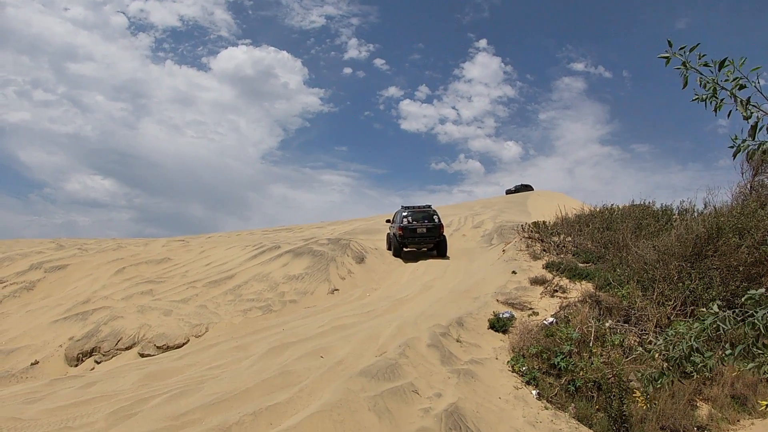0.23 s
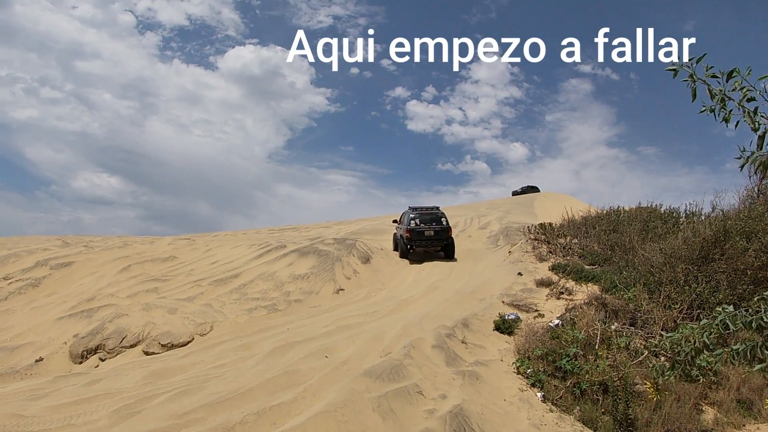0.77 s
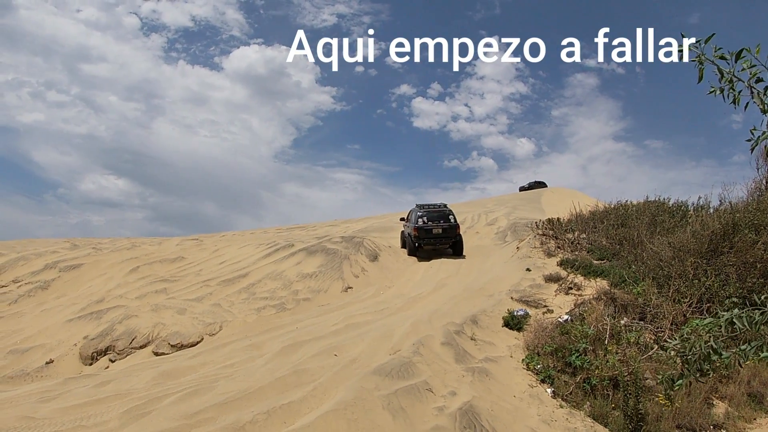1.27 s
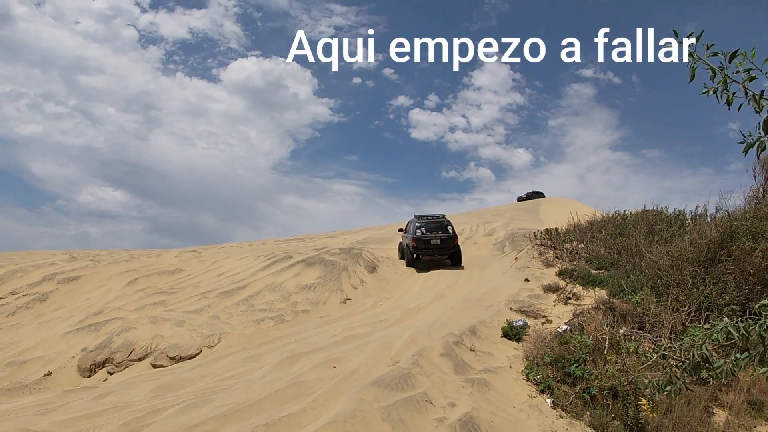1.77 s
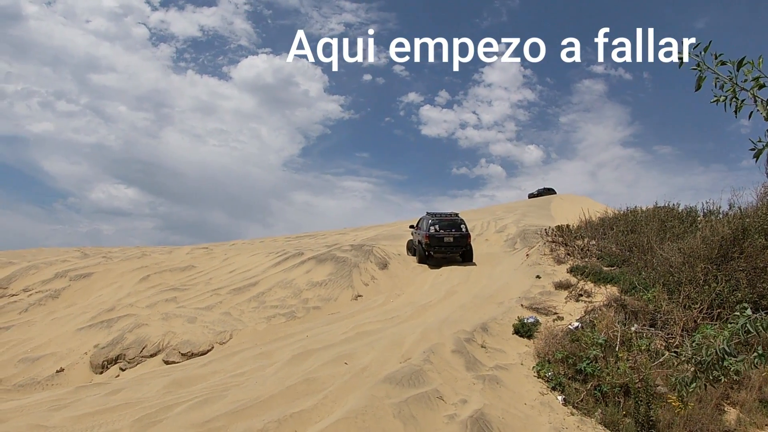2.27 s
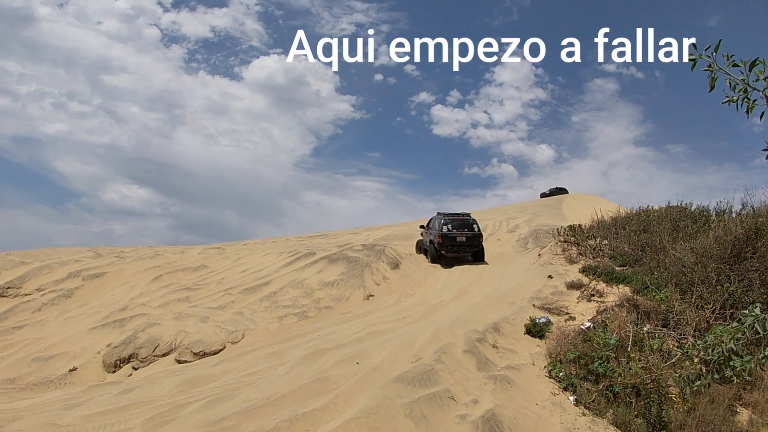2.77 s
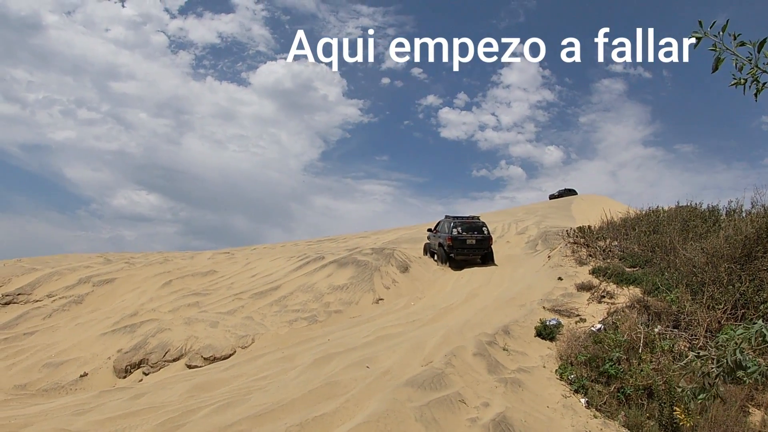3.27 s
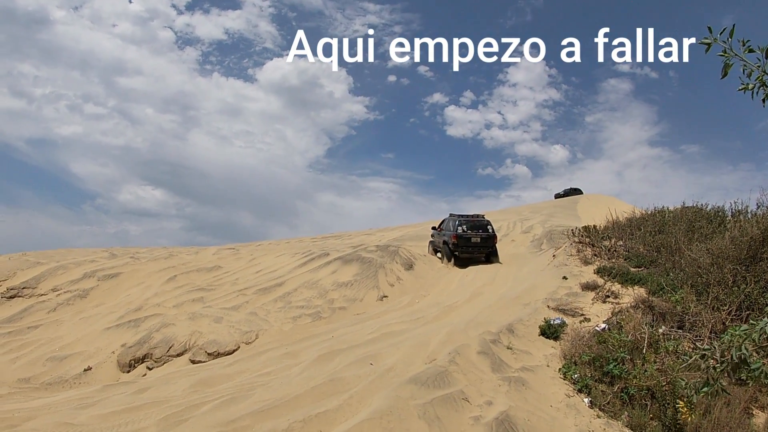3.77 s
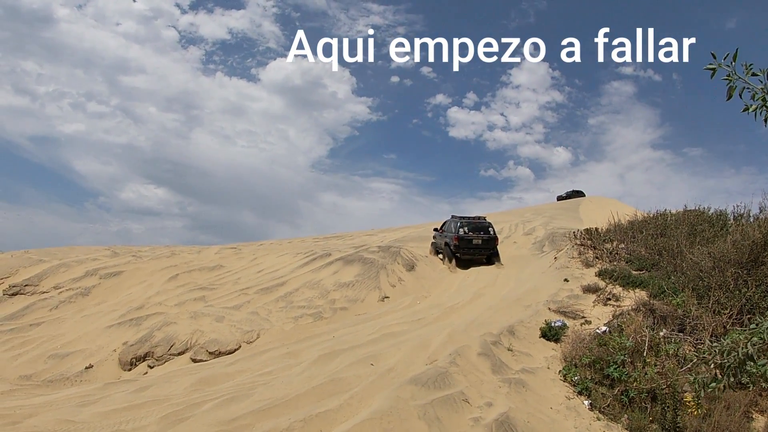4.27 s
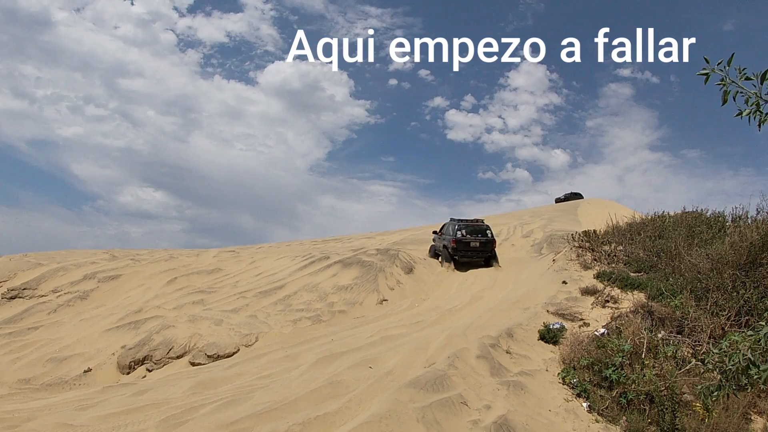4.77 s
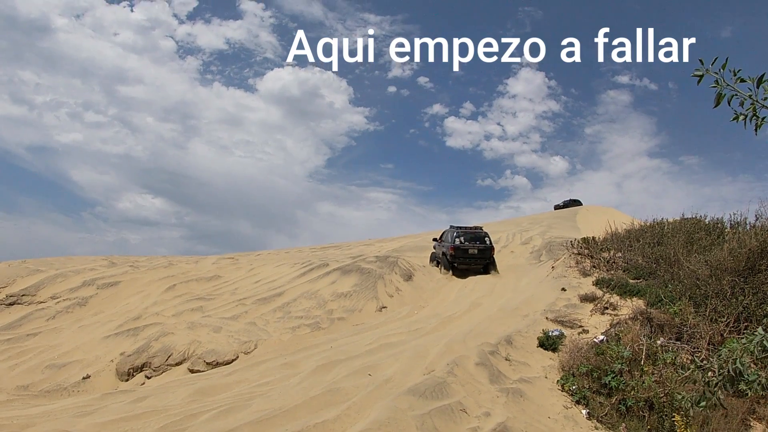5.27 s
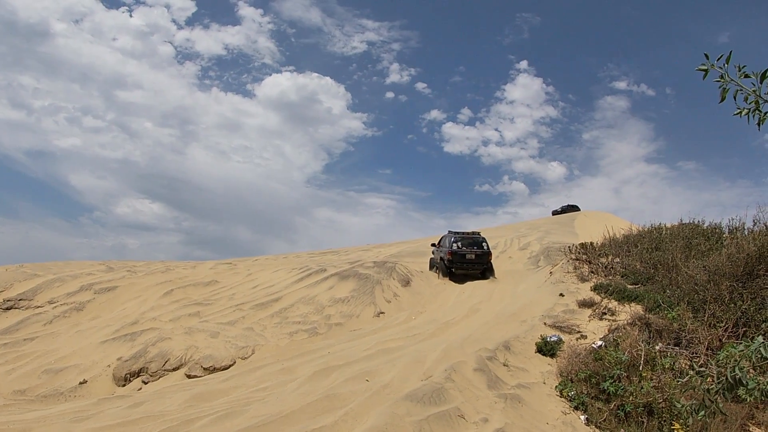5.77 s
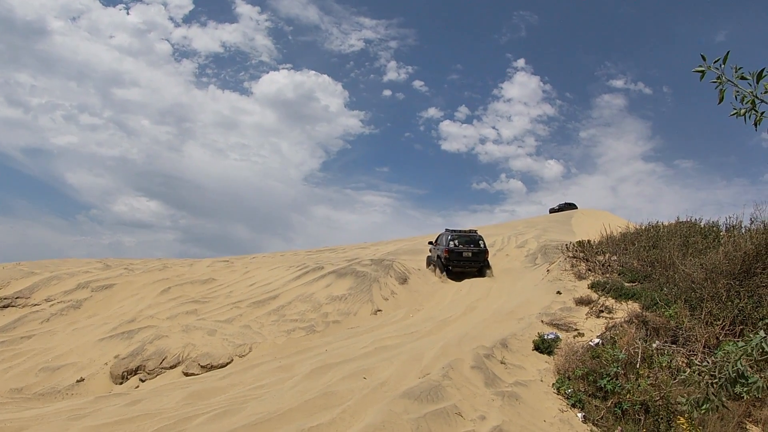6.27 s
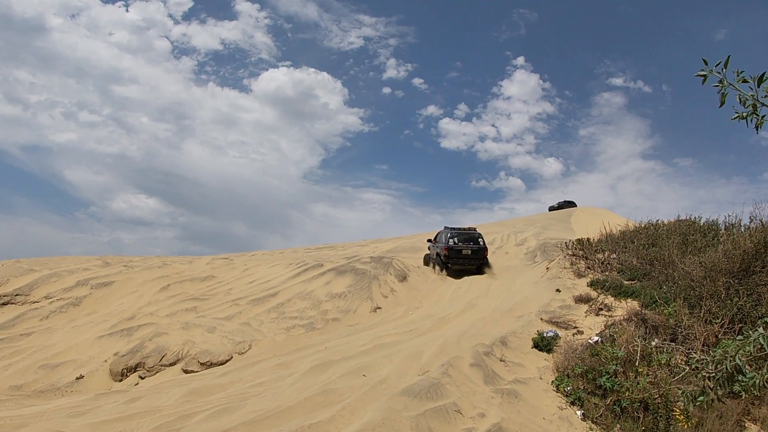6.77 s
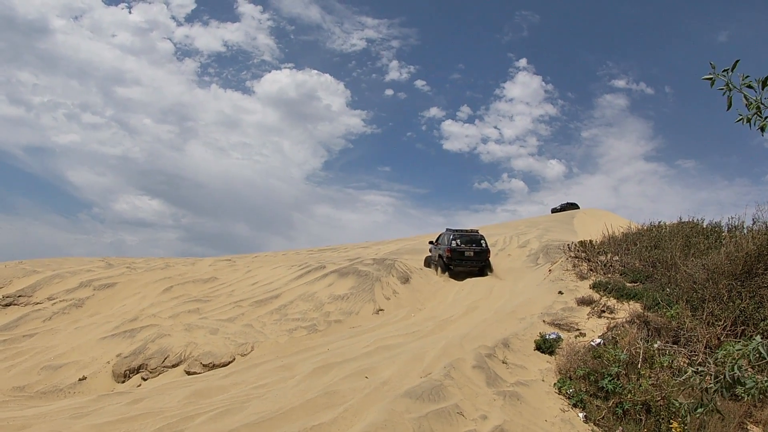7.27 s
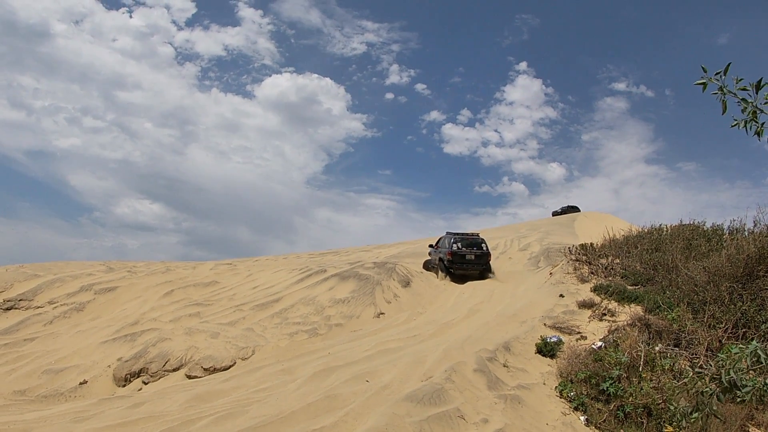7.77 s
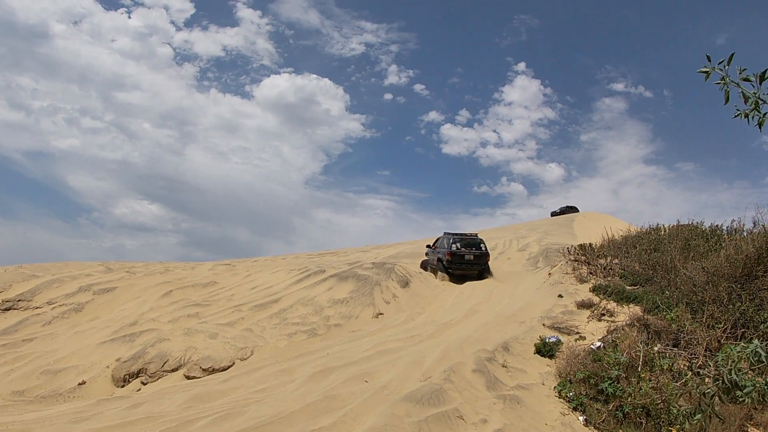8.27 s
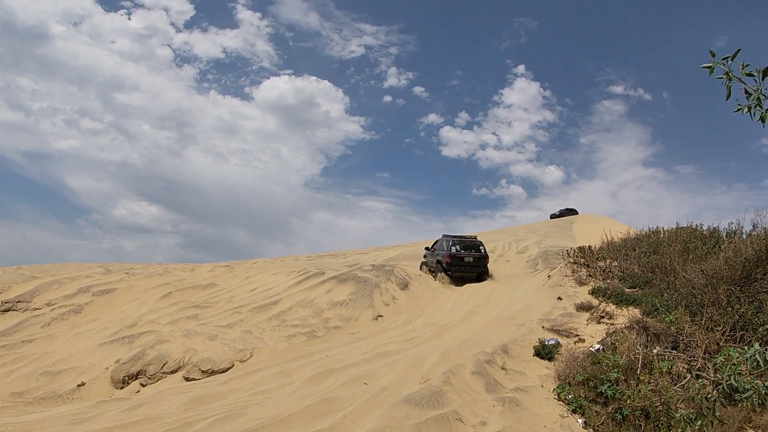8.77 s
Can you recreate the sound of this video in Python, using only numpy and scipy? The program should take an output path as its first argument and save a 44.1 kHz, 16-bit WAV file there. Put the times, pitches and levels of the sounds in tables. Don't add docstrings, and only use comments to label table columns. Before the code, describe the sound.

Some way off in the open, a big off-road engine lugs with a deep throbbing burble, then revs up over about three seconds. One cylinder drops out and the note turns to a rough gallop with popping exhaust, held high and steady except for one brief throttle lift. Sand and gas hiss. Wind thumps and small case ticks hit the phone microphone early on.

```python
import sys
import numpy as np
from scipy import signal
from scipy.io import wavfile
from scipy.ndimage import uniform_filter1d

SR = 44100
rng = np.random.default_rng(int(sys.argv[2]) if len(sys.argv) > 2 else 0)


def ratio(d):
    e = np.asarray(d, float) / 20
    return 10 ** e


def int16_out(signal):
    q = np.round(np.clip(np.atleast_2d(signal).T, -1, 1) * 32767)
    wavfile.write(sys.argv[1], SR, q.astype(np.int16))


N = 398223

# (t/s, firing rate f/Hz)
SPEED = [(0.0, 43.63), (0.69, 51.26), (1.31, 47.0), (1.56, 51.3), (1.75, 58.35), (2.0, 82.93), (2.4, 81.17),
         (2.6, 86.46), (3.14, 111.43), (3.3, 115.43), (3.68, 135.11), (4.16, 144.22), (5.01, 143.15),
         (5.43, 146.21), (6.25, 154.74), (7.01, 155.7), (8.18, 151.94), (9.03, 161.89)]
LIFT_S, SAG_S, SAG_HZ = 5.56, .12, 19.2


def speed():
    since_lift = np.maximum(np.arange(N) / SR - LIFT_S, 0) / SAG_S
    return curves(SPEED)[0] - SAG_HZ * since_lift * np.exp(1 - since_lift)


def crank():
    rate = speed() / 8
    return rate, np.cumsum(rate) / SR


# (t/s, level/dB)
EFFORT = [(0, -0.5), (.3, -5.5), (.5, -1), (.65, -5.5), (1.2, -3.5), (1.55, -2.5), (1.68, -7), (1.78, -2),
          (2.4, -1.5), (3, 1), (3.67, -0.5), (4.2, 1.5), (5.57, .5), (5.62, -5), (5.7, -1), (5.9, 1.5),
          (6.34, -.5), (9.03, 0)]


def effort():
    return curves(EFFORT)[0]


# (f/Hz, level/dB)
OUTLET = [(45, -26.5), (62, -17.5), (100, -15), (160, -17), (210, -30), (250, -52.5), (490, -55.5),
          (600, -37)]
VALVE_TONES = [-0.5, -7, -9.5, -15]
BUZZ_HZ, BUZZ_WIDTH_HZ, BUZZ_DB = 236, 8, -44


def firing():
    rate, charge_db = speed(), effort()
    firings = 8 * crank()[1]
    leads = [.218, -.18, .44, -.02]
    near = np.exp(-((5 * rate - BUZZ_HZ) / BUZZ_WIDTH_HZ) ** 2)
    out = ratio(BUZZ_DB) * near * np.cos(10 * np.pi * firings)
    for k, (valve_db, lead) in enumerate(zip(VALVE_TONES, leads), start=1):
        level = ratio(valve_db + curves(OUTLET, k * rate)[0] + charge_db)
        out += np.sqrt(2) * level * np.cos(2 * np.pi * (k * firings + lead))
    return out


# (f/Hz, sharpness)
PIPE = [(41.5, 3.4), (105.5, 6.5), (180.5, 6.7)]
ECHO, ECHO_S = .487, .014


def pipe(hz, buzz):
    out = -hz ** 2 * (1 + ECHO * np.exp(-2j * np.pi * hz * ECHO_S))
    for f, sharp in PIPE:
        out = out / (1 - (hz / f) ** 2 + 1j * hz / f / sharp)
    panel = 1 + 2.0 * buzz * np.exp(-((hz - 244) / 15) ** 2)
    return out * panel / (1 + (hz / 262) ** 16)


PANEL_HZ = (139, 147)


def unevenness(cylinders, late, hurry):
    rate, cycles = crank()
    cycles = cycles + hurry * (np.maximum(rate, 16.7) - 17.3) / 8
    coarse_rate = rate[::64]
    buzz = np.interp(8 * coarse_rate, PANEL_HZ, [.2, 1.2])
    strength, lateness = np.transpose(cylinders)
    place = np.arange(8) + lateness + late
    out, power = np.zeros(N), np.zeros(N)
    for k in [1, 2, 3, 4, 5, 6, 7, 9, 10, 11, 12, 13, 14]:
        share = np.sum(strength * np.exp(-2j * np.pi * k * place / 8))
        tone = share * np.repeat(pipe(k * coarse_rate, buzz), 64)[:N]
        out += (tone * np.exp(2j * np.pi * k * cycles)).real
        power += abs(tone) ** 2 / 2
    return out / np.sqrt(power)


HEALTHY = [(.92, 0), (1, -.07), (.85, .01), (1.27, .02), (1.07, -.1), (1, .006), (1.16, -.057), (.72, .026)]
# (firing rate f/Hz, unevenness level/dB)
UNEVEN = [(43, -25.5), (50, -42), (72, -18), (82, -25.5), (110, -33.5)]
DIES_S = 3.15


def healthy():
    level = ratio(curves(UNEVEN, speed())[0])
    return (1 - after(DIES_S, 0.072)) * level * unevenness(HEALTHY, late=2.77, hurry=0)


MISFIRING = [(1.5, 0), (1.26, .006), (-.65, -.117), (1.45, .176), (.69, -.007), (1.67, .014), (.94, .013),
             (1.12, .124)]
# (firing rate f/Hz, lope level/dB)
LOPE = [(105, -32.5), (112, -25), (120, -21), (135, -20), (145, -20.5), (155, -17.5)]
FALTERS_S = 2.96


def lope():
    level = ratio(curves(LOPE, speed())[0] + .4 * effort())
    return after(FALTERS_S, .08) * level * unevenness(MISFIRING, late=1.27, hurry=.06)


# (firing rate f/Hz, pop level/dB, second pop level/dB against the first, rush level/dB)
MISFIRE = [(110, -37, -7.5, -69), (130, -29.5, -4, -48), (141, -37, -6, -55), (152.3, -34, 2, -45.5)]
# (place in the cycle [0-1], level/dB, ring f/Hz, t60/s)
POPS = [
    (.6, 3.5, 600, .014),
    (.79, -3, 420, .03),
    (.59, -4, 410, .025),
    (.8, -9, 345, .04),
    (.82, -5, 640, .015),
    (.06, -5, 520, .02),
    (.25, -10, 470, .025),
    (.37, -13, 520, .02),
]
# (f/Hz, level/dB per Hz)
POP_COLOUR = [(150, -24.5), (260, 8.5), (290, -21), (420, -2), (478, -12.5), (648, 0.5), (815, -31),
              (908, -10.5), (1150, -24), (1400, -21.5), (3500, -37.5), (4550, -62.5), (7700, -120)]
POP_EFFORT, RUSH_EFFORT = 2.6, 2.4


def pops():
    pop_db, second_db, rush_db = curves(MISFIRE, speed())
    pop_db = pop_db + POP_EFFORT * effort()
    rush_db = rush_db + RUSH_EFFORT * effort()
    slams, t = np.zeros(N), np.arange(2500) / SR
    for k, (place, db, hz, t60) in enumerate(POPS):
        ring = ratio(db - 60 * t / t60) * np.sin(2 * np.pi * hz * t) * (1 - np.exp(-t / .0007))
        level = ratio(pop_db + second_db * (k in (1, 3)))
        slams += signal.oaconvolve(strikes(place, .0001, 1.2) * level, ring)[:N]
    flame = np.exp(-t / .0035) * (1 - np.exp(-t / .0004))
    sparks = strikes(.6, .0003, 1.2) + .25 * strikes(.81, .0005, 2.2)
    lit = signal.oaconvolve(sparks, flame)[:N]
    rush = ratio(rush_db) * coloured(lit * rng.standard_normal(N), POP_COLOUR)
    return after(DIES_S + 0.052, 0.28) * (1.42 * slams + rush)


# (tones a cycle, level/dB)
RASP = [(18, -53), (19, -54), (21, -57), (22, -53), (23, -54)]


def rasp():
    cycles = crank()[1]
    up = np.interp(speed(), [135, 153], [0, 1])
    waver, out = lumps(.05), np.zeros(N)
    for k, db in RASP:
        level = ratio(db + 2 * np.roll(waver, 999 * k))
        out += level * np.sqrt(2) * np.cos(2 * np.pi * k * (cycles - .84))
    return up * out


# (f/Hz, level/dB)
WHINE = [(774, -59), (1178, -66), (345, -59)]


def whine():
    t = np.arange(N) / SR
    return sum(ratio(db - 1.3 * t + 1.5 * lumps(.08)) * np.sin(2 * np.pi * hz * t) for hz, db in WHINE)


# (firing rate f/Hz, roar level/dB, fine hiss level/dB against it)
ROAR = [(44.7, -55, -15.5), (84, -55.5, -16.5), (115, -57.5, -15.5), (151, -57, -10.5), (164, -54, -10)]
# (t/s, length/s, roar level/dB, hiss level/dB against it)
SPRAYS = [(.08, 0.52, 2.5, -3.5), (.8, 1, -0.5, -1), (1.24, 0.79, 4, -1.5), (1.33, 0.09, 0.5, 7),
          (2.03, 0.66, 2, 1.5), (5.92, 0.32, 2, -1), (6.8, .8, 1, -1), (8.2, 1, 4, -1.5),
          (8.38, 0.26, -1.5, 6), (8.6, 0.48, -1, -0.5), (9.03, .4, -1, -0.5)]
# (f/Hz, level/dB per Hz)
ROAR_COLOUR = [(150, -31), (300, -0.5), (520, -9), (850, -13), (1040, -10.5), (1250, -13.5), (1500, -13),
               (1800, -14.5), (2080, -14), (2330, -18.5), (2570, -17.5), (2850, -27), (4300, -29),
               (8800, -67.5)]
# (f/Hz, level/dB per Hz)
HISS_COLOUR = [(1760, -31), (3000, -9.5), (3690, -15), (4300, -7), (5490, -3), (6400, -5), (7090, -10.5),
               (7400, -15), (8490, -9), (9000, -7), (9900, -15.5), (10700, -27.5), (11400, -39.5),
               (13300, -41.5), (14500, -47.5)]
# (f/Hz, level/dB per Hz)
GAS_COLOUR = [(1200, -21), (1450, 6), (1780, -11), (2064, -3.5), (2300, -16), (2500, -4.5), (3350, -12.5),
              (3650, -30.5)]
GAS_DB, ROAR_EFFORT = -13, 0.55


def roar():
    roar_db, hiss_db = np.add(curves(ROAR, speed()), swells(SPRAYS))
    roar_db = roar_db + ROAR_EFFORT * effort() * after(DIES_S, 0.69)
    since_pop = (crank()[1] - .58) % 1
    surge = after(DIES_S, .3) * (1 - 2 * since_pop ** 2)
    gas_db = GAS_DB + curves(MISFIRE, speed())[2] + RUSH_EFFORT * effort()
    gas = after(DIES_S, 0.33) * (1 + .5 * surge) * coloured(rng.standard_normal(N), GAS_COLOUR)
    body = coloured(rng.standard_normal(N) * ratio(1.5 * lumps(0.0099)), ROAR_COLOUR)
    hiss = coloured(rng.standard_normal(N) * ratio(1.1 * lumps(0.025)), HISS_COLOUR)
    sand = (1 + 0.25 * surge) * body + ratio(hiss_db - 3.0) * (1 + 0.11 * surge) * hiss
    return ratio(roar_db + 5.5) * sand + ratio(gas_db) * gas


# (t/s, peak level/dB, centre f/Hz, width/Hz, t60/s)
TICKS = [(0.923, -40, 2200, 1200, .05), (1.091, -43.5, 2200, 2400, 0.044), (1.2, -42, 2300, 2400, 0.055),
         (1.25, -39, 1790, 2600, .03), (1.262, -42, 2200, 2780, 0.036), (1.341, -51, 8000, 4000, .005),
         (1.351, -49, 8500, 3000, .005), (1.358, -21, 5230, 2330, 0.0071), (1.3581, -27, 8450, 4600, 0.005),
         (1.358, -33, 2830, 1200, .005), (1.3582, -41.5, 13500, 1980, 0.0035), (1.4, -42, 2600, 4000, .04),
         (1.945, -37.5, 2180, 3000, 0.061), (3.15, -48, 2140, 1600, .04), (2.035, -49, 3500, 3000, .03),
         (2.1, -43.5, 2320, 2210, 0.044), (2.919, -55, 8500, 7000, 0.0044),
         (2.9218, -33, 8100, 5400, 0.0069), (2.921, -43, 4620, 1000, .004),
         (2.922, -41, 2680, 1200, 0.0089), (3.0286, -35, 4930, 1810, 0.0038),
         (3.029, -50, 8500, 5000, .004), (3.03, -48, 2600, 1400, .006), (3.0335, -41.5, 6000, 7940, .005),
         (4.658, -43, 2210, 2500, 0.029)]


def ticks():
    out, t = np.zeros(N), np.arange(3000) / SR
    for s, db, hz, width, t60 in TICKS:
        band = signal.butter(4, [max(hz - width / 2, 300), hz + width / 2], "band", fs=SR)
        click = (t == 0) * (t60 < .009) * 4
        snap = click + rng.standard_normal(len(t)) * ratio(-60 * t / t60)
        onset = np.minimum(t / t60 * 6 + (t60 < .02), 1)
        burst = signal.lfilter(*band, snap * onset)
        out[round(s * SR):][:len(t)] += ratio(db) * burst / abs(burst).max()
    return out


# (f/Hz, level/dB)
WIND_COLOUR = [(10, -14.5), (25, 1), (50, -4.5), (110, -3), (200, -13.5), (300, -33), (600, -44.5),
               (1200, -70)]
# (t/s, length/s, level/dB)
GUSTS = [
    (.1, 0.15, 12.5),
    (.29, 0.48, 4.5),
    (.54, 0.26, -2),
    (.66, 0.21, 6),
    (.8, 0.26, 7),
    (1.6, 0.27, 8.5),
    (1.92, 1, 5.5),
    (2.6, 0.65, 3.5),
    (3, 0.76, 7),
    (4, 1, 10),
]
# (t/s, peak level/dB)
THUMPS = [
    (0.035, -33),
    (0.088, -24),
    (0.174, -28.5),
    (0.321, -22.5),
    (0.653, -34),
    (0.724, -28.5),
    (0.813, -27),
    (1.597, -30),
    (2.975, -30),
    (2.991, -26.5),
]
BREEZE_DB, EASES_DB_PER_S, CALM_DB = -27, 3, -40.5


def wind():
    rumble = coloured(rng.standard_normal(N) * ratio(2.6 * lumps(0.018)), WIND_COLOUR)
    breeze_db = np.maximum(BREEZE_DB - EASES_DB_PER_S * np.arange(N) / SR, CALM_DB)
    out = ratio(breeze_db + swells(GUSTS)[0]) * rumble
    t = np.arange(2600) / SR
    soft = signal.butter(4, 520, fs=SR)
    for s, db in THUMPS:
        push = np.sin(2 * np.pi * 190 * t) * np.exp(-t / 0.0053)
        flutter = 3 * rng.standard_normal(len(t)) * t / 0.0062 * np.exp(-t / 0.0031)
        puff = signal.lfilter(*soft, push + flutter)
        part = out[round(s * SR):][:len(t)]
        part += ratio(db + 10.5) * puff / abs(puff).max()
    return out


def evened(x):
    return x / np.sqrt(np.mean(x ** 2) + 1e-20)


def curves(rows, by=None):
    s, *columns = np.transpose(rows)
    control = np.arange(N) / SR if by is None else by
    return [np.interp(control, s, c) for c in columns]


def coloured(x, points):
    f, db = np.transpose(points)
    hz = abs(np.fft.fftfreq(8192, 1 / SR))
    log_gain = np.log(ratio(np.interp(np.log(hz + 1), np.log(f), db, -100, -100)))
    taps = np.fft.ifft(np.exp(np.conj(signal.hilbert(log_gain)))).real[:4096]
    return evened(signal.oaconvolve(x, taps)[:N])


def lumps(width_s):
    size = round(width_s * SR)
    return evened(uniform_filter1d(uniform_filter1d(rng.standard_normal(N), size), size))


def strikes(place, jitter_s, spread_db):
    at = np.flatnonzero(np.diff(np.floor(crank()[1] - place)))
    luck = rng.standard_normal((len(at), 2))
    shift = (jitter_s * SR * luck[:, 0]).astype(int)
    out = np.zeros(N)
    out[np.clip(at + shift, 0, N - 1)] = ratio(spread_db * luck[:, 1])
    return out


def swells(rows):
    s, length, *db = np.transpose(rows)
    t = np.arange(0, N, 64)[:, None] / SR
    hump = np.cos(np.pi * np.clip((t - s) / length, -.5, .5)) ** 2
    return [np.repeat(hump @ d, 64)[:N] for d in db]


def after(s, rise_s):
    return np.clip((np.arange(N) / SR - s) / rise_s + .5, 0, 1)


def scene():
    air = ratio(0.13 * lumps(0.0091))
    exhaust = (firing() + healthy() + lope()) * air
    vehicle = exhaust + pops() + rasp() + whine() + roar()
    return (vehicle + ticks() + wind())[None]


def low_pass(x):
    return signal.sosfilt(signal.butter(12, 14600, fs=SR, output="sos"), x)


EDGE_HZ, SHELF_HZ, SHELF_DB = 15500, 11000, -12


def record(dry):
    low, wide = (signal.firwin(255, hz, window=("kaiser", 7), fs=SR) for hz in (SHELF_HZ, EDGE_HZ))
    taps = low + ratio(SHELF_DB) * (wide - low)
    mix = signal.oaconvolve(dry, taps[None], "same")
    return low_pass(mix)


dry = scene()
out = record(dry)
int16_out(out)
```